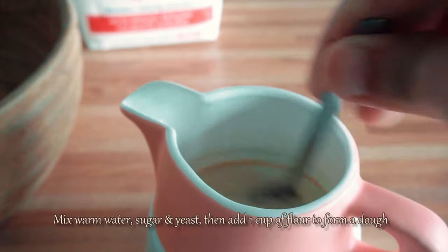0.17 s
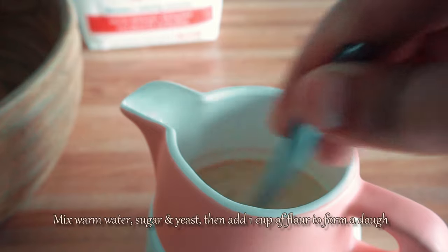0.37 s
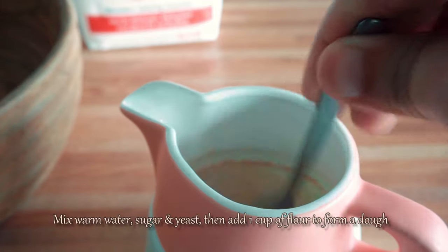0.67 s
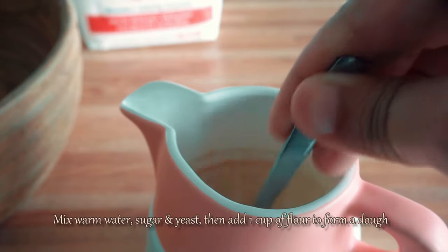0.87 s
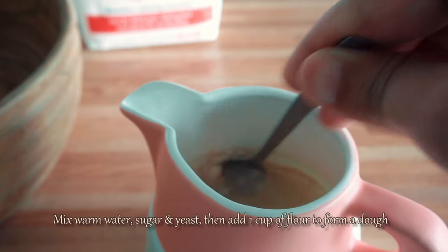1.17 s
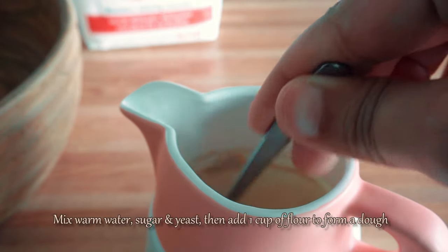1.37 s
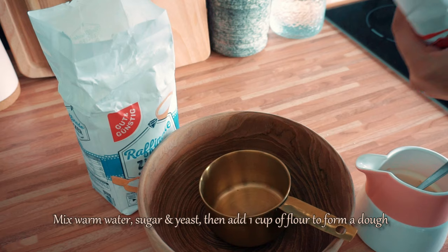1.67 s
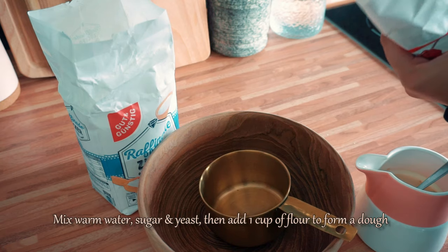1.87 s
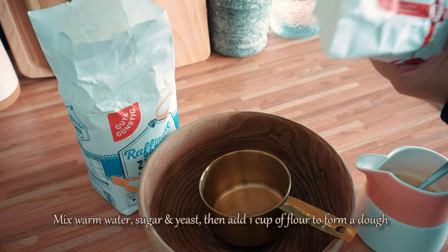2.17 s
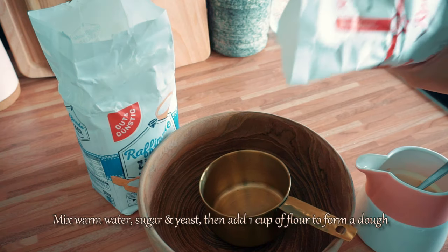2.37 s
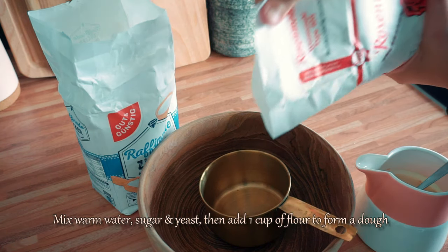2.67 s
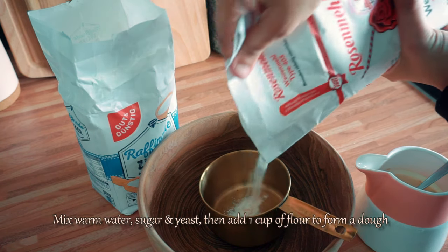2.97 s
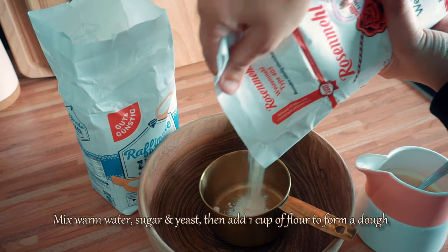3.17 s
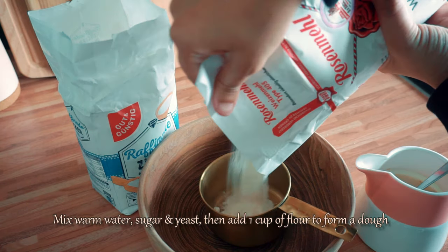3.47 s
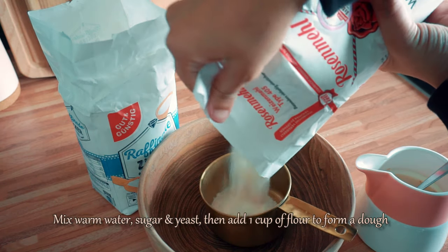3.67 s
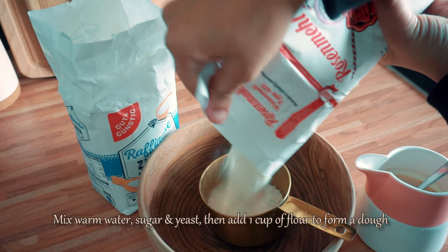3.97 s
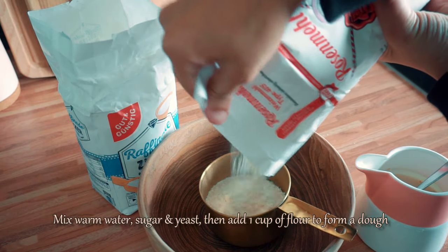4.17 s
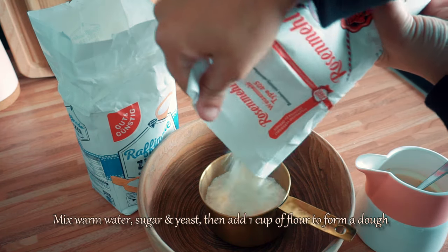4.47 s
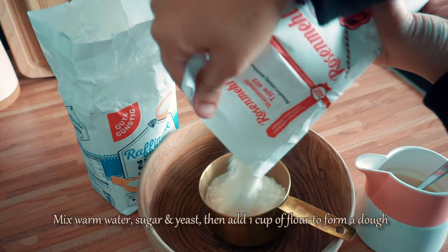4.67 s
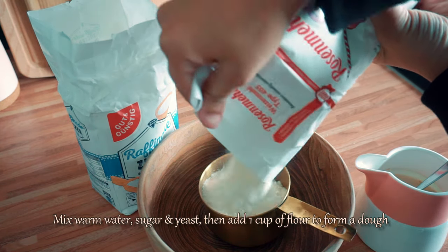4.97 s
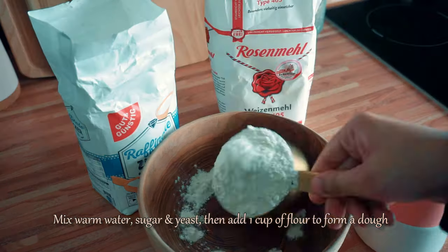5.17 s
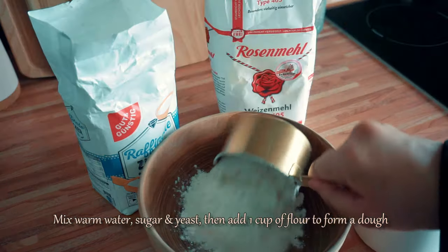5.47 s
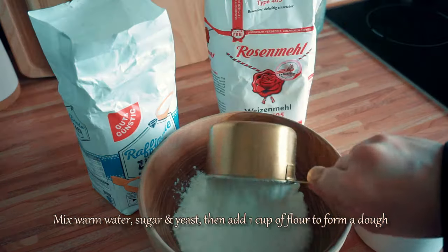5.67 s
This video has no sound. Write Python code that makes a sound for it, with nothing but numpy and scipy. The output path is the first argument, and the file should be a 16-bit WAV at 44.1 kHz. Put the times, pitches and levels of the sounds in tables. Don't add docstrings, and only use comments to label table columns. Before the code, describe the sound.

Very close to the microphone, a steel spoon stirs liquid in a ceramic jug, with gritty scrapes, small hollow sloshes and ringing clinks over room hiss. An abrupt cut brings crackling paper and a boomy sack, faint flour hiss and several hard knocks in a small kitchen. After another cut flour slumps dully into a wooden bowl, then near silence with a faint cloth brush.

```python
import sys
import numpy as np
from scipy import signal
from scipy.fft import rfft, irfft, next_fast_len
from scipy.io import wavfile
from scipy.ndimage import map_coordinates

SR = 44100
rng = np.random.default_rng(int(sys.argv[2]) if len(sys.argv) > 2 else 0)


def natural_amplitude(level_db):
    exponent = np.asarray(level_db, float) / 20
    return 10 ** exponent


def log_audio(samples):
    frames = np.atleast_2d(samples).T
    limited = np.clip(frames, -1, 1)
    pcm = np.round(limited * 32767).astype(np.int16)
    wavfile.write(sys.argv[1], SR, pcm)


N = 256220

# (f/Hz, likeness/0..1)
LIKENESS = [(35, 0.55), (70, 0.76), (150, 0.66), (300, 0.47), (1000, 0.11), (4000, 0.08), (12000, 0.092)]
# (t/s, level/dB)
SCENE_FADE = [(0, -2), (1.741, 1), (1.744, -83), (1.757, -72), (1.773, -42), (1.776, -2), (1.81, -6.5),
              (1.9, 1), (5.81, 2.5)]
# (t/s, f/Hz)
CAVITY = [(0, 727), (0.029, 765), (0.055, 1070), (0.166, 927), (0.27, 900), (0.328, 1051), (0.44, 900),
          (0.517, 1051), (0.609, 886), (0.79, 927), (0.939, 760), (1.019, 770), (1.129, 1058), (1.2, 1060),
          (1.28, 891), (1.47, 960), (1.53, 809), (1.743, 860)]
# (f/Hz, t60/s, then level/dB at floor, spout, handle, far wall, glancing, rim)
JUG_MODES = [(1446, 0.021, -37, -14, -20, -14, -11.5, -22), (2157, 0.16, -22, -29.5, -15.5, -19, -21, -17),
             (2540, 0.2, -15.5, -32, -18, -11.5, -30, -18.5), (2874, 0.039, -8.5, -20, -31, -33, -14, -25),
             (3180, 0.025, -17.5, -21, -9.5, -35, -22, -10),
             (3690, 0.032, -17.5, -35, -20, -11.5, -13, -11), (4170, 0.03, -17, -11.5, -42, -25, -14, -23),
             (4830, 0.039, -16, -13.5, -26, -13.5, -20, -24), (5414, 0.043, -11.5, -16, -3, -14, -13.5, -8),
             (7120, 0.02, -27, -36, -7, -10, -17.5, -14), (8040, 0.016, -23, -12, -5, -20, -20, -15),
             (9120, 0.036, -32, -16.5, -9, -37, -27, -25), (9920, 0.025, -28, -14, -16, -35, -21, -27),
             (6240, 0.023, -28, -23, -16, -25, -29, -15)]
# (f/Hz, t60/s, then level/dB at the same six spots)
SPOON_MODES = [(5000, 0.04, -30, -20, -26, -24, -28, -23), (8630, 0.036, -28, -14.5, -15, -36, -27, -29),
               (10360, 0.041, -30, -18.5, -24, -34, -30, -30), (11500, 0.023, -34, -30, -18, -32, -28, -26),
               (13100, 0.025, -34, -19, -17, -28, -23.5, -16), (14300, 0.018, -36, -21, -20, -29, -28, -22)]
# (f/Hz, density/dB per Hz)
GRIT = [(2500, -15), (5000, -9.5), (9000, -13.5), (15800, -13)]
# (t/s, crack level/dB, crack f/Hz, pan/dB)
KNOCKS = [
    (1.3313, -35, 3000, 3),
    (2.132, -52, 700, -1),
    (2.962, -59, 2600, -7),
    (2.991, -57, 4000, -4),
    (3.006, -57, 2300, -1.5),
    (3.7506, -14.5, 2520, -3.5),
    (4.334, -22.5, 2030, -2),
    (5.031, -18.5, 2300, -2),
    (5.1, -26, 1400, -1),
    (5.276, -42, 1500, 2),
]


def unit(x):
    return x / np.sqrt(np.mean(x ** 2) + 1e-20)


def along(points, hz):
    f, v = np.transpose(points)
    return np.interp(np.log(hz + 1), np.log(f + 1), v)


def curves(rows):
    s, *cols = np.transpose(rows)
    t = np.arange(N) / SR
    return [np.interp(t, s, c) for c in cols] + [(t >= s[0]) & (t < s[-1])]


def filtered(x, response):
    m = next_fast_len(x.shape[-1] + 8192)
    spectrum = rfft(x, m) * response(np.fft.rfftfreq(m, 1 / SR))
    return irfft(spectrum, m)[..., :x.shape[-1]]


def peaks(table):
    def response(f):
        return sum((-1) ** k * natural_amplitude(db) * 1j * f * w / (c * c - f * f + 1j * f * w)
                   for k, (c, w, db) in enumerate(table))
    return response


def wobble(rate):
    coarse = np.arange(0, N + 16, 16)
    knots = rng.standard_normal(int(N * rate / SR) + 5)
    return np.interp(np.arange(N), coarse, map_coordinates(knots, [coarse * rate / SR]))


def swells(s, hold, db, rise, fall):
    t = np.arange(0, N / SR, 1e-3)[:, None]
    level = db - rise * np.maximum(s - t, 0) - fall * np.maximum(t - s - np.abs(hold), 0)
    return np.interp(np.arange(N) / SR, t[:, 0], np.sqrt(np.sum(natural_amplitude(level) ** 2, axis=1)))


def jolted(s, rise):
    nearest_knock = np.abs(s[:, None] - np.array(KNOCKS)[:, 0]).min(axis=1)
    return np.where(nearest_knock < 0.02, 3000, rise)


def rustle(spectrum, grain_db=0., clump_db=0., alike=LIKENESS):
    gain = natural_amplitude(grain_db * wobble(700) + clump_db * wobble(45))

    def response(hz):
        turn = np.arccos(np.clip(along(alike, hz), -1, 1)) / 2
        return natural_amplitude(along(spectrum, hz)) * [np.cos(turn), np.sin(turn)]

    mid, side = filtered(gain * rng.standard_normal((2, N)), response)
    return unit(np.array([mid + side, mid - side]))


def add(out, s, x, pan_db, wet_db):
    # (f/Hz, t60/s)
    room_t60 = [(200, 0.23), (1000, 0.54), (4000, 0.44), (12000, 0.12)]
    hz, t = np.linspace(0, SR / 2, 129), np.arange(90) * 128 / SR
    z = rng.standard_normal((2, len(hz), len(t), 2)) @ [1, 1j]
    like = np.clip(along(LIKENESS, hz), 0, 1)[:, None]
    z[1] = like * z[0] + np.sqrt(1 - like ** 2) * z[1]
    decay = natural_amplitude(-60 * t / along(room_t60, hz)[:, None])
    tail = signal.istft(z * decay, SR, nperseg=256)[1]
    tail = tail / np.linalg.norm(tail[0])
    wet = natural_amplitude(wet_db) * signal.fftconvolve(np.pad(x, (130, 0))[None], tail, axes=1)
    lag = int(min(abs(.4 * pan_db), 4))
    wet[0, lag * (pan_db < 0):][:len(x)] += x * natural_amplitude(pan_db / 2)
    wet[1, lag * (pan_db > 0):][:len(x)] += x * natural_amplitude(-pan_db / 2)
    part = out[:, round(s * SR):][:, :wet.shape[1]]
    part += wet[:, :part.shape[1]]


def ring(modes, t, scatter_db, rough=0.):
    knots = np.arange(0, t[-1] + .012, .006)
    draw = rng.standard_normal((len(modes), 3))
    waver = rng.standard_normal((len(modes), 2, len(knots)))
    shake = rough * np.clip(np.array(modes)[:, 0] / 4000, .55, 1.5)
    out = np.zeros(len(t))
    for (hz, db, t60), (d, p, e), (a, b), r in zip(modes, draw, waver, shake):
        u = t[t < t60]
        level = db + scatter_db * d - 60 * u / t60 + 3.32 * r * np.interp(u, knots, a)
        phase = 2 * np.pi * hz * (1 + 0.004 * r * e) * u + p + r * np.interp(u, knots, b)
        out[:len(u)] += natural_amplitude(level) * np.sin(phase)
    return out


def click(t, hz, q, t60):
    band = signal.iirpeak(hz, max(q, .3), SR)
    force = (t == 0) + 0.14 * rng.standard_normal(len(t)) * natural_amplitude(-60 * t / t60)
    x = signal.lfilter(*band, signal.lfilter(*band, force))
    return x / np.abs(x).max()


def carried(slips, width_hz, hz):
    band = signal.sosfilt(signal.butter(2, width_hz, fs=SR, output="sos"), slips)
    phase = 2 * np.pi * np.cumsum(hz) / SR
    return unit(band[0] * np.cos(phase) + band[1] * np.sin(phase))


def air():
    # (t/s, level/dB)
    hiss_level = [(0, -55.5), (1.745, -54), (1.775, -69.5), (1.9, -65), (5.81, -60.5)]
    # (f/Hz, density/dB per Hz)
    first_spectrum = [(20, -58), (70, -47), (160, -23), (300, -16.5), (550, -11.5), (1300, -15),
                      (4000, -22), (15800, -30)]
    later_spectrum = [(20, -63), (60, -31), (130, -30.5), (300, -11.5), (550, -14.5), (1300, -17),
                      (3000, -20.5), (15800, -30.5)]
    # (f/Hz, level/dB, from t/s, to t/s)
    hum = [(100, -88, .5, 1.745), (345, -67, 5.4, 5.81)]
    t = np.arange(N) / SR
    tones = 0
    for hz, db, start, end in hum:
        drift = natural_amplitude(1.5 * wobble(12)) * np.exp(1.2j * wobble(14))
        tone = (drift * np.exp(2j * np.pi * hz * t)).real
        tones = tones + natural_amplitude(db) * tone * np.clip((t - start) / 0.11, 0, 1) * (t < end)
    first, later = rustle(first_spectrum, clump_db=1.5), rustle(later_spectrum, clump_db=2.0)
    return natural_amplitude(curves(hiss_level)[0]) * np.where(t < SCENE_FADE[2][0], first, later) + tones


def stirring():
    # (t/s, hold/s, slosh level/dB, wall scrape level/dB, fine grit level/dB)
    strokes = [(0.002, 0.0037, -42.5, -48, -43), (0.058, 0.061, -66, -56, -51.5),
               (0.163, 0.078, -52, -66, -59), (0.25, 0.084, -57, -66, -52.5), (0.428, 0.022, -63, -56, -76),
               (0.537, 0.039, -50.5, -41, -40.5), (0.643, 0.087, -48.5, -56, -53),
               (0.77, 0.0069, -60, -47, -50), (0.948, 0.011, -41.5, -55, -38),
               (1.051, 0.014, -53, -49.5, -43), (1.137, 0.03, -57, -83, -80),
               (1.33, 0.036, -49.5, -64, -85), (1.39, 0.0081, -53, -60, -48),
               (1.465, 0.015, -43.5, -51, -63), (1.56, 0.059, -50.5, -46.5, -49),
               (1.68, 0.024, -51, -53, -55)]
    # (t/s, hold/s, level/dB)
    gurgles = [(0.15, 0.082, -56), (0.515, 0.037, -45.5), (0.78, 0.012, -49), (0.942, 0.023, -55.5),
               (1.352, 0.039, -55.5), (1.466, 0.049, -53.5)]
    rise, fall = 520, 234
    cavity_hz, on = curves(CAVITY)
    s, hold, *levels_db = np.transpose(strokes)
    swish, scrape, grit = (swells(s, hold, db, rise, fall) for db in levels_db)
    gurgle = swells(*np.transpose(gurgles), 1500, fall)

    def slips():
        return natural_amplitude(3.5 * wobble(300) + 1.5 * wobble(45)) * rng.standard_normal(N)

    slosh = carried([slips(), slips()], 95, cavity_hz)
    swirl = unit(filtered(slips(), peaks([(585, 390, -2.5), (286, 72, 1.5)])))
    wall_modes = [(row[0], 140, row[2]) for row in JUG_MODES if row[0] < 4500]
    rim_modes = [(row[0], 180, row[3]) for row in JUG_MODES + SPOON_MODES if row[0] > 4500]
    wall = unit(filtered(slips(), peaks(wall_modes)))
    rim = unit(filtered(slips(), peaks(rim_modes)))
    near = natural_amplitude(-3.5) * swish * (slosh + 0.33 * swirl) + gurgle * swirl
    near = near + natural_amplitude(-10) * scrape * wall + natural_amplitude(-15.5) * grit * rim
    out = natural_amplitude(-9) * grit * rustle(GRIT, grain_db=3.0, clump_db=2.5) * on
    add(out, 0, (near * on)[:2 * SR], pan_db=-.6, wet_db=-6)
    return out


def clinks():
    # (t/s, peak level/dB, cavity level/dB, crack level/dB, pan/dB)
    contacts = [
        [(0.014, -35.5, -8.5, -19, 9), (0.056, -38, 3.5, -20, 4), (0.167, -28, -9, -26, 3),
         (0.202, -39.5, 6.5, -21, 2), (0.255, -34.5, -9, -18, 0), (0.267, -40, 1, -20, -2),
         (0.306, -43, -2, -13, 3), (0.317, -48, -16, -15, 2), (0.326, -43.5, 1, -15, 11),
         (0.614, -34, -9, -17, 6.5), (0.755, -33.5, -15, -24, -2), (1.136, -39.5, 2.5, -2, 3),
         (1.635, -44.5, -2.5, -16, 0)],
        [(0.5177, -10, -18, -11, 3)],
        [(0.9427, -15, -35, -2, 3)],
        [(1.284, -39, -2, -24, 3), (1.462, -15, -28, -19, -2), (1.467, -20.5, -17.5, -22, 2)],
        [(0.5782, -27.5, -13, -22, 0), (0.787, -24.5, -27, -22, 3), (0.793, -23, -22, -12, 2),
         (0.832, -44, -30, 4, 3), (0.856, -27.5, -32, -11, 2), (1.073, -31.5, -29, -17, 0),
         (1.323, -33, -30, -20, 7), (1.3265, -34, -28, -16, 2), (1.3295, -25.5, -22, -21, 1),
         (1.605, -27.5, -31, -5.5, 2.5), (1.677, -29, -13.5, -16, -4.5), (1.683, -29.5, -21, -14, 3)],
        [(1.178, -36.5, -9, -24, 5.5), (1.356, -21, -13.5, -19, 2.5)],
    ]
    spot_ring = [0.67, 1.15, 1.02, 0.97, 0.53, 0.97]
    out, t = np.zeros((2, N)), np.arange(SR // 8) / SR
    early = 1 + 2.4 * natural_amplitude(-60 * t / 0.0081)
    for spot, rows in enumerate(contacts):
        modes = [(hz, levels_db[spot] - 9.0, t60 * spot_ring[spot])
                 for hz, t60, *levels_db in JUG_MODES + SPOON_MODES]
        for s, db, cavity_db, crack_db, pan_db in rows:
            hz = np.interp(s, *np.transpose(CAVITY))
            cavity_modes = [(hz, 0, .03), (1.18 * hz, -10, .02), (0.521 * hz, -9, .04)]
            pop = ring(cavity_modes, t, scatter_db=1.5) * (1 - np.exp(-t / 0.0015))
            body = early * ring(modes, t, scatter_db=0.3, rough=1.25)
            crack = natural_amplitude(crack_db - 60 * t / 0.0082) * np.diff(rng.standard_normal(len(t) + 1))
            x = natural_amplitude(cavity_db + 5.0) * pop + body + crack
            add(out, s, natural_amplitude(db) * x * (1 - np.exp(-t / 0.00053)), pan_db, wet_db=-9.5)
    return out


def drags():
    # (from t/s, to t/s, level/dB, first f/Hz, last f/Hz, width/Hz)
    scrapes = [(0.175, 0.34, -56.5, 3300, 3200, 140), (0.24, 0.343, -51, 3100, 3050, 190),
               (0.21, 0.35, -63, 4500, 4600, 110), (0.33, 0.335, -56, 4700, 6300, 130),
               (0.555, 0.61, -53, 2850, 3200, 79), (0.69, 0.725, -60, 3120, 3130, 70),
               (0.705, 0.718, -60, 4600, 4600, 170), (0.76, 0.77, -57, 6500, 12000, 250),
               (0.78, 0.825, -54, 2600, 4500, 124), (0.8, 0.85, -74, 3200, 11000, 77),
               (1.03, 1.12, -61, 13400, 13200, 350), (1.66, 1.692, -60, 3500, 3900, 82),
               (1.68, 1.742, -58, 2520, 2540, 29), (1.55, 1.64, -57, 1700, 1650, 90),
               (1.34, 1.45, -74, 2000, 2130, 58), (1.042, 1.107, -53.5, 4460, 3900, 270),
               (1.028, 1.097, -54, 8400, 8000, 200), (1.556, 1.594, -47.5, 4780, 4590, 660),
               (1.562, 1.628, -60, 2000, 2700, 94)]
    out = np.zeros((2, N))
    for start, end, db, first_hz, last_hz, width_hz in scrapes:
        u = np.linspace(0, 1, int((end - start) * SR))
        grip = np.repeat(rng.standard_normal(len(u)), 256)[:len(u)]
        slips = natural_amplitude(4.4 * grip) * rng.standard_normal((2, len(u)))
        x = carried(slips, width_hz, first_hz + (last_hz - first_hz) * u)
        x = x * np.sin(np.pi * u ** 0.65) ** .5
        add(out, start, natural_amplitude(db) * x, pan_db=-2.0, wet_db=-11.5)
    return out


def thumps():
    # (t/s, level/dB, f/Hz)
    pushes = [
        (0.518, -52, 198),
        (0.943, -63, 200),
        (1.462, -56, 120),
        (1.968, -68, 90),
        (3.751, -63, 150),
        (4.335, -50, 200),
        (5.032, -73, 80),
        (5.102, -60, 60),
        (5.276, -54, 130),
    ]
    out, t = np.zeros(N), np.arange(SR // 8) / SR
    for s, db, hz in pushes:
        push = (1 - hz * 4.1 * t) * np.exp(-hz * 4.4 * t) * (1 - np.exp(-t / 0.0008))
        out[round(s * SR):][:len(t)] += natural_amplitude(db) * push
    return signal.sosfilt(signal.butter(2, 600, fs=SR, output="sos"), out)


def knocks():
    # (f/Hz, level/dB, t60/s)
    hollows = [
        [(1236, -29, 0.035), (1650, -36.5, 0.051), (3000, -29.5, 0.0072)],
        [(504, -35.5, 0.04), (352, -44.5, 0.076), (725, -43, 0.023)],
        [(1493, -48.5, 0.2), (2630, -53, .1), (2900, -52, .04), (5440, -63, .1)],
        [(1420, -51, 0.15), (4050, -51.5, 0.04), (2280, -53, 0.12), (2700, -53, .05)],
        [(1500, -49, 0.1), (1335, -54, 0.1), (5500, -61, 0.08)],
        [(790, -28.5, 0.023), (530, -40.5, 0.035), (1610, -26, 0.012), (2900, -33, .01), (1080, -26, 0.011),
         (4000, -28, 0.014), (6300, -25, 0.011), (7930, -16, 0.0057)],
        [(765, -31.5, 0.061), (796, -46.5, 0.28), (743, -45.5, 0.43), (692, -40, 0.3), (623, -39.5, 0.24),
         (396, -38.5, 0.072), (228, -38.5, 0.039), (1155, -31.5, 0.017), (1950, -25, 0.0061),
         (2920, -27, 0.009), (4050, -26, 0.0078)],
        [(1285, -16, 0.01), (1010, -30, 0.0081), (1750, -19, 0.0096), (2830, -23, 0.0089), (4330, -26, 0.0051),
         (6000, -26, .007), (8400, -27, 0.01)],
        [(900, -28, 0.013), (1210, -18.5, 0.0098), (1900, -22, 0.013), (2590, -23.5, 0.013),
         (2160, -30, 0.0097), (4000, -22.5, 0.0091), (3300, -35, 0.006)],
        [(1015, -34, 0.03), (628, -43, 0.028), (2300, -46, 0.012)],
    ]
    out, t = np.zeros((2, N)), np.arange(SR // 4) / SR
    for (s, db, hz, pan_db), modes in zip(KNOCKS, hollows):
        blow = click(t, hz, q=0.83, t60=0.0057)
        rebound = np.roll(click(t, 1.85 * hz, q=0.43, t60=0.0072), round(0.0015 * SR))
        body = ring(modes, t, scatter_db=0.5, rough=0.85) * (1 - np.exp(-t / 0.00023))
        add(out, s, natural_amplitude(db) * (blow + 0.95 * rebound) + body, pan_db, wet_db=-7.0)
    return out


def bag():
    # (t/s, level/dB)
    flow = [(1.78, -66.5), (2.55, -62), (3.2, -60.5), (3.5, -57), (4.1, -57.5), (4.6, -58), (5.0, -52.5),
            (5.272, -59.5)]
    # (t/s, hold/s, level/dB, brightness/dB: sliding high, creasing low)
    rubs = [(1.915, 0.066, -52, -3.5), (1.999, 0.061, -55.5, -3.5), (2.185, 0.04, -78, -6),
            (2.3, 0.033, -49, 1.5), (2.35, 0.061, -52.5, 10.5), (2.43, 0.043, -57, 2),
            (2.83, 0.017, -58.5, 0), (2.99, 0.024, -66, -11), (3.41, 0.0074, -68, 14),
            (3.555, 0.037, -57.5, -2), (3.58, 0.011, -50, 1.5), (3.72, 0.031, -58, -6),
            (3.755, 0.057, -46.5, -3), (3.956, 0.0089, -56.5, -2), (4.03, 0.041, -68, -18),
            (4.14, 0.034, -64.5, -16), (4.338, 0.021, -54, -11.5), (4.4, 0.083, -59.5, 1.5),
            (4.795, 0.02, -66, -8), (5.035, 0.032, -49, 0.5), (5.103, 0.019, -54, -7),
            (5.24, 0.036, -51.5, 4)]
    # (t/s, hold/s, level/dB)
    booms = [(1.964, 0.033, -51.5), (2.193, 0.025, -53), (2.297, 0.16, -65), (2.867, 0.35, -66.5),
             (3.753, 0.057, -50.5), (3.94, 0.017, -59.5), (4.353, 0.048, -50.5), (4.453, 0.066, -59.5),
             (4.803, 0.048, -58), (5.101, 0.015, -49), (5.205, 0.013, -58)]
    # (f/Hz, density/dB per Hz)
    hiss_spectrum = [(3000, -23.5), (7000, -6.5), (10000, -4.5), (15800, -6.5)]
    middle_spectrum = [(1500, -23), (3000, 0.5), (5000, -1), (7500, -6), (11000, -18.5)]
    crackle_spectrum = [(400, -34), (900, 2), (1500, 4.5), (2500, 2), (3500, -8), (6000, -13.5)]
    boom_spectrum = [(120, -27), (300, 0), (600, 2.5), (900, 0), (1500, -39)]
    flow_db, on = curves(flow)
    s, hold, db, bright_db = np.transpose(rubs)

    def effort(share):
        rubbing = swells(s, hold, db + share * bright_db, jolted(s, 250), 276)
        return np.hypot(natural_amplitude(flow_db), rubbing)

    hiss = natural_amplitude(-1.5) * effort(1) * rustle(hiss_spectrum, grain_db=1.0, clump_db=-1.5)
    middle = natural_amplitude(-3) * effort(0) * rustle(middle_spectrum, grain_db=-1.0, clump_db=2.5)
    crackle = natural_amplitude(-2) * effort(-0.6) * rustle(crackle_spectrum, grain_db=-1.5, clump_db=2.0)
    crackle = crackle * natural_amplitude([[-.8], [.8]])
    boom_s, *shape = np.transpose(booms)
    boom = swells(boom_s, *shape, jolted(boom_s, 230), 130)
    boom = boom * rustle(boom_spectrum, grain_db=3.0, clump_db=2)
    return on * (hiss + middle + crackle + boom)


def snaps():
    # (t/s, peak level/dB, centre f/Hz, brightness/dB, pan/dB)
    creases = [(1.811, -37, 1330, -33, -6), (1.852, -38, 3370, -35, -5), (1.908, -34.5, 1950, -4.5, -9),
               (1.939, -29, 2030, -3, -7), (1.9512, -31.5, 2150, -25, -6), (1.9678, -30, 6300, -40, 2),
               (1.9691, -30.5, 1960, -0.5, -3.5), (1.9768, -31.5, 2160, -21, -3),
               (2.177, -31.5, 1850, -38, -9), (2.1856, -26, 1650, -33, -6.5), (2.189, -34, 2570, -27, -4),
               (2.196, -36, 2020, -27, -5), (2.203, -27, 2370, -5.5, -6.5), (2.221, -30, 3230, -12, 3.5),
               (2.288, -33, 1530, -17, -5), (2.414, -34, 2290, 1, -7.5), (2.4499, -27.5, 2250, -11, -6.5),
               (2.168, -39, 4500, -22, 2), (3.4132, -32, 13500, -14, 2), (3.4045, -43, 12000, -14, 0),
               (3.47, -44, 14000, -17, 0), (3.497, -40, 14000, -15, 2), (3.955, -45, 1440, -15, 0),
               (4.04, -45, 1680, -25, 0), (4.165, -42, 2190, -25, -2), (4.18, -48, 1900, -25, -1),
               (5.264, -41, 2500, -12, 0), (3.981, -40.5, 1570, -21, 0), (4.754, -48.5, 2280, 4, 12),
               (4.797, -37, 1040, -18, -6)]
    out, t = np.zeros((2, N)), np.arange(SR // 20) / SR
    for s, db, hz, bright_db, pan_db in creases:
        edge = natural_amplitude(bright_db + 8.5) * click(t, 5700, q=0.75, t60=0.013)
        x = click(t, hz, q=0.84, t60=0.028) + edge
        add(out, s, natural_amplitude(db - 0.5) * x, pan_db, wet_db=-5.0)
    return out


def slump():
    # (t/s, hold/s, level/dB)
    flour = (5.278, 0.0054, -41)
    # (f/Hz, width/Hz, level/dB)
    bowl = [(543, 600, -7), (1050, 500, -4.5), (2020, 260, -9.5), (2350, 400, -10)]
    fall = swells(*flour, 2500, 95)
    lumps = natural_amplitude(0.99 * wobble(220)) * rng.standard_normal((2, N))
    lumps = 0.77 * lumps[0] + .5 * lumps * [[0], [1]] + .5 * lumps[::-1] * [[-1], [0]]

    def response(f):
        return peaks(bowl)(f) * f / (f + 300) / np.hypot(1, (f / 2750) ** 4)

    return fall * unit(filtered(lumps, response))


def sleeve():
    # (t/s, half length/s, level/dB)
    brush = (5.525, 0.058, -60)
    s, half, db = brush
    shape = np.exp(-((np.arange(N) / SR - s) / half) ** 2)
    return natural_amplitude(db) * shape * rustle(GRIT, grain_db=-2.0)


def scene():
    mic_low_hz, first_change_s, second_change_s = 222, 1.76, 5.272
    t = np.arange(N)
    jug = (stirring() + clinks() + drags()) * (t < first_change_s * SR)
    paper = bag() + snaps() * (t < second_change_s * SR)
    near = jug + knocks() + paper + slump() + sleeve()
    return filtered(near, lambda f: (1j * f / (mic_low_hz + 1j * f)) ** 4) + air() + thumps()


def top_cut(x):
    return signal.sosfilt(signal.butter(12, 16500, fs=SR, output="sos"), x)


def record(dry):
    dry = dry / (1 + np.abs(dry / .5) ** 4) ** (1 / 4)
    dry = filtered(dry, lambda f: np.where(f < 15880, 1, natural_amplitude(-32)))
    return top_cut(dry * natural_amplitude(curves(SCENE_FADE)[0]))


dry = scene()
out = record(dry)
log_audio(out)
```